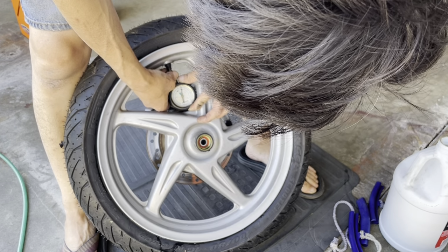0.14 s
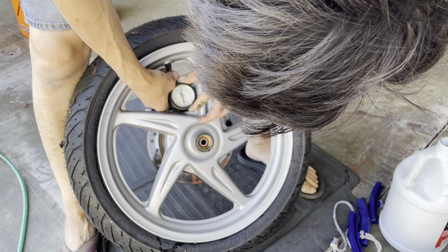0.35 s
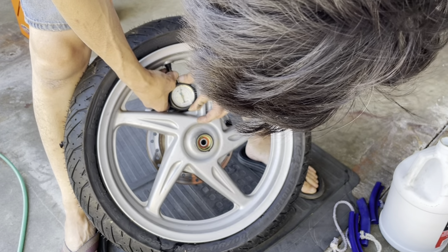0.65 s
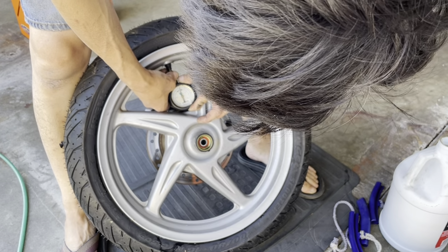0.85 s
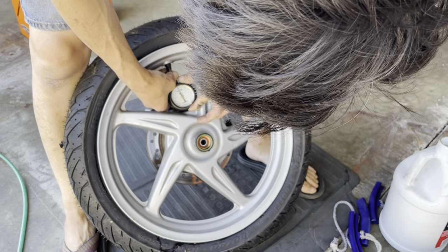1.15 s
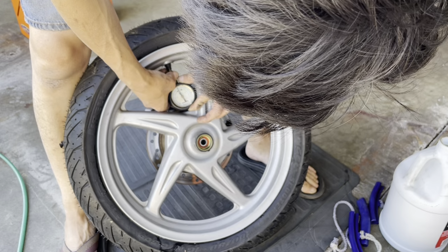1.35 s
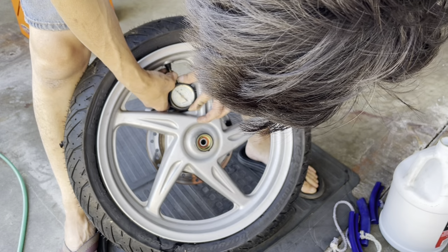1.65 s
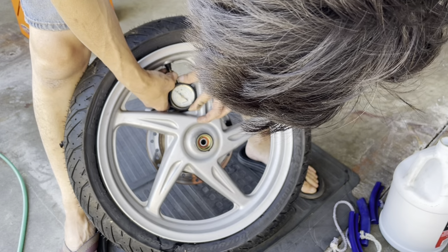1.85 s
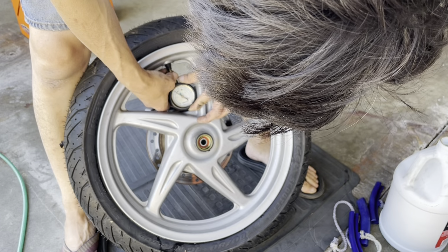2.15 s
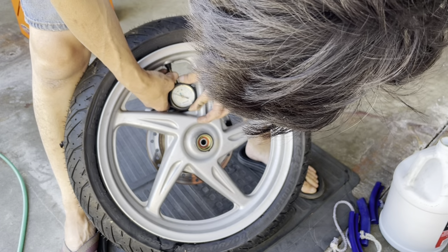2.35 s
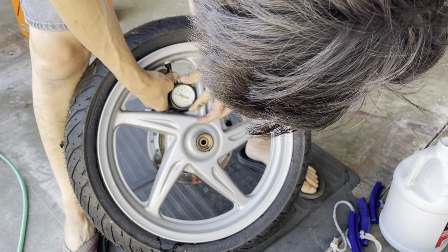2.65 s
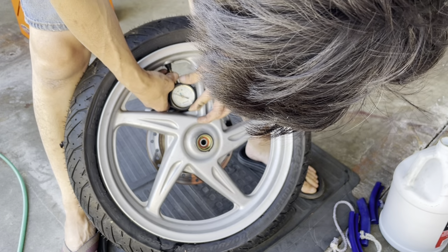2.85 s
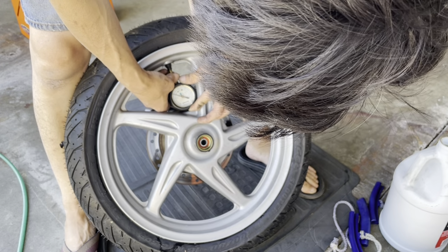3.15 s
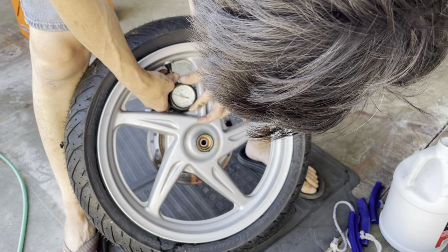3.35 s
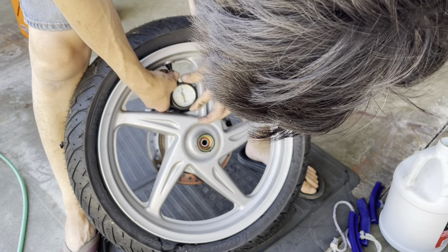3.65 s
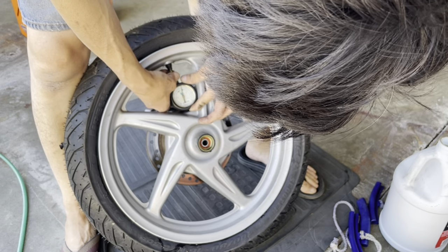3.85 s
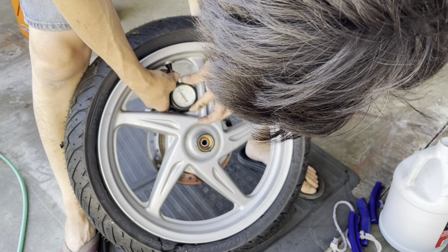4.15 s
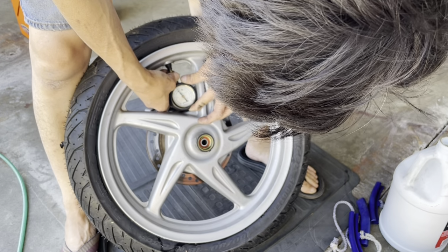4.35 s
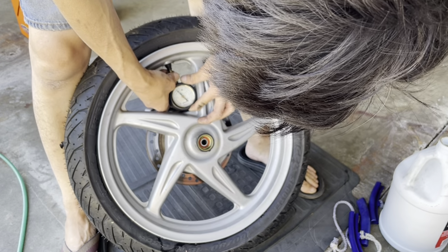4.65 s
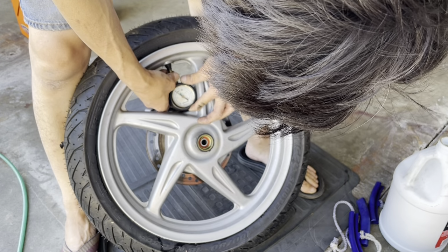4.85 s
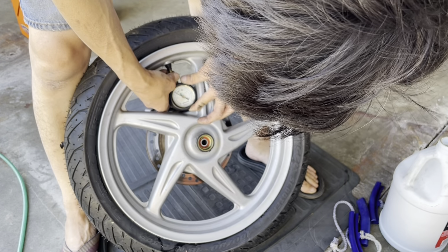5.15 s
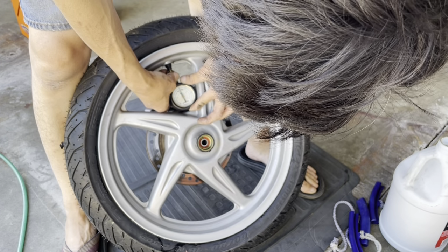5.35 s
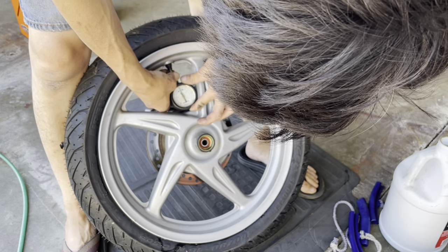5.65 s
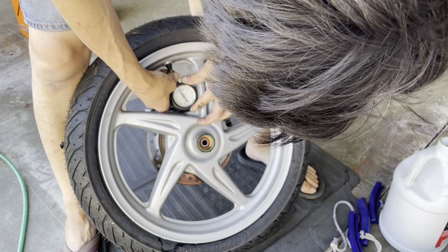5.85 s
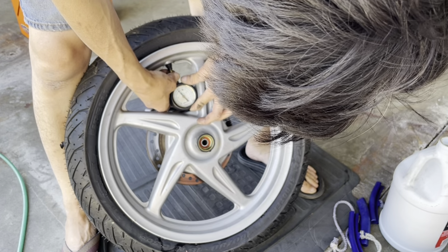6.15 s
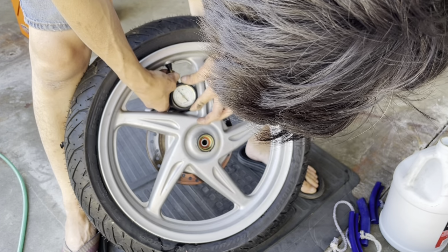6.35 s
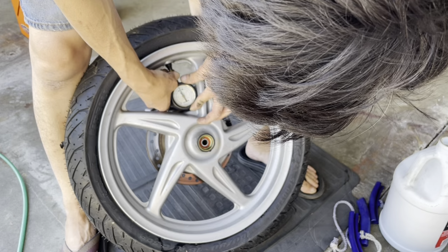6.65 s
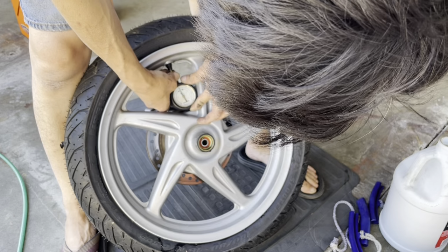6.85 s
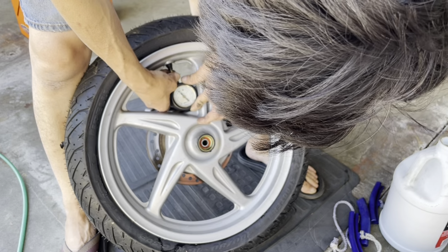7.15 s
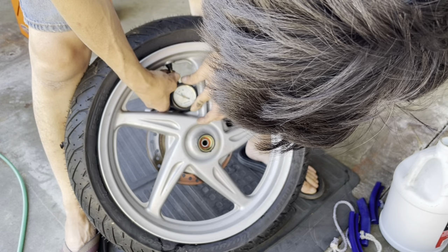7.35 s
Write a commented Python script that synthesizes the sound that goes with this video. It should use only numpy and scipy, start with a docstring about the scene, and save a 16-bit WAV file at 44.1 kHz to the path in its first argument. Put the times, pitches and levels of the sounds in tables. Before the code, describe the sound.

A strong, bright, gritty air jet from a scooter tyre runs about three and a half seconds, dips slightly midway, and stops abruptly. After a short gap with a light gauge tick, three weaker bursts follow, the middle one the softest and the last cut short by the ending. Close stereo microphone, left-leaning, short hard-walled reflections, low wavering motor hum and outdoor rumble underneath.

```python
"""In a small hard-walled yard air is let out of a scooter tyre: one long release, then three shorter ones.
A gauge pressed on the valve makes a jet of noise, coloured by the opening, the hand and the hollow of the wheel.
It leans left on a two-port microphone; blusters and shifts of the gauge recolour it, and broad bands come and go.
Each release has a short tail of decaying noise, and the gauge ticks twice, a noise snap with ringing sines.
Behind it are a far motor of wavering sines, a second faint hum and shaped outdoor noise."""
import sys
import numpy as np
from scipy import signal
from scipy.fft import rfft, irfft
from scipy.io import wavfile
from scipy.ndimage import uniform_filter1d

SR = 44100
rng = np.random.default_rng(int(sys.argv[2]) if len(sys.argv) > 2 else 0)


def master_out(mix):
    """Clip the mix to full scale and print it as 16-bit PCM to the path in sys.argv[1]."""
    frames = np.transpose(np.atleast_2d(mix))
    ceiling = np.clip(frames, -1, 1)
    pcm = np.round(ceiling * 32767).astype(np.int16)
    wavfile.write(sys.argv[1], SR, pcm)


N = 330309

# Presses of the gauge on the valve; the first is already open at the start.
# Each row: cracks open in seconds, seats on the pin in seconds, time to seat in seconds,
# let go in seconds, time to shut in seconds, first thin jet in relative dB, full flow in relative dB,
# opening in dB, low rush of air brushing the fingers in dB, top fizz in dB,
# edge resonance in Hz, its width in Hz, its boost in dB.
PRESSES = [(-0.3, -0.2, .03, 3.418, .075, -46, -28, -1, -3, -0.5, 11080, 1097, 2),
           (3.899, 3.971, .04, 5.302, 0.049, -43.5, -35, -1.7, -1, 0, 12970, 900, 3.5),
           (5.723, 5.743, 0.043, 6.47, 0.069, -40.5, -39, 4, 1.5, 1.5, 10280, 1400, 2),
           (6.878, 7.095, .012, 7.606, .07, -45, -31, 0, -0.7, -2.5, 2750, 1900, 3)]
SEEP_S = 0.15  # the next press takes over this long before it cracks open

TIME = np.arange(N) / SR
FRAME, HOP = 1024, 256  # short-time spectra, in samples
HZ = np.fft.rfftfreq(FRAME, 1 / SR)
FRAME_S = np.arange(N // HOP + 5) * HOP / SR


def amp(db):
    """Decibels to gain."""
    return 10 ** (np.asarray(db) / 20)


def unit(x):
    """Scales to an rms of 1."""
    return x / np.sqrt(np.mean(x ** 2) + 1e-20)


def over_hz(points, hz=HZ):
    """Reads a spectrum on a log-frequency axis."""
    f, value = np.transpose(points)
    return np.interp(np.log(hz + 1), np.log(f + 1), value)


def over_time(rows, t):
    """Reads every column of a curve at the times t."""
    s, *columns = np.transpose(rows)
    return [np.interp(t, s, column) for column in columns]


def ramp(t, start, length):
    """Rises from 0 to 1 and stays there."""
    return np.clip((t - start) / length, 0, 1)


def bump(centre_hz, width_hz):
    """A resonance curve of height 1, with its full width at half height."""
    return 1 / (1 + (2 * (HZ - centre_hz) / width_hz) ** 2)


def blend(first, other, likeness):
    """Mixes noise as strong as the first and alike to it by the given share."""
    likeness = np.clip(likeness, -1, 1)
    return likeness * first + np.sqrt(1 - likeness ** 2) * other


def noise_pair(likeness):
    """Random short-time spectra for two partly alike channels."""
    a, b, c, d = rng.standard_normal((4, len(FRAME_S), len(HZ)))
    left = a + 1j * b
    return np.array([left, blend(left, c + 1j * d, likeness)])


def to_sound(spectra):
    """Short-time spectra to samples."""
    return signal.istft(spectra.swapaxes(-1, -2), nperseg=FRAME, noverlap=FRAME - HOP)[1][..., :N]


def wander(rate_hz):
    """Slow random drift of rms 1, mostly below the given rate."""
    hz = np.fft.rfftfreq(N, 1 / SR)
    return unit(irfft(rfft(rng.standard_normal(N)) / (1 + (hz / rate_hz) ** 4), N))


def patches(size=14):
    """Random patches of rms 1 over time and frequency."""
    chance = rng.standard_normal((len(FRAME_S), len(HZ)))
    over_frames = uniform_filter1d(chance, size, axis=0)
    return unit(uniform_filter1d(over_frames, size // 2, axis=1))


def press_at(t):
    """Which press is under way at the times t."""
    return np.searchsorted([row[0] - SEEP_S for row in PRESSES[1:]], t)


def valve(t):
    """A pin valve seeps, cracks open, seats, shifts and shuts, which sets the flow and colour of its jet."""
    # The gauge shifts on the pin and stays so until the next press. Each row: start in seconds,
    # length in seconds, then the change in dB of flow, of opening, of brushing and of top fizz.
    shifts = [(0.013, .1, 1, 4.5, -0.5, 0.5), (0.41, 0.22, -2, -1, 0, 0.5), (1.25, 0.36, 1.7, -3.9, -.5, 1),
              (2.4, 0.014, -3, 1.6, 4, 1), (2.51, 0.037, 1.5, 0.36, 3, -1.5),
              (2.642, 0.13, -1.7, 0.86, 1, 0), (2.88, .08, -0.7, 0, 0, 3), (4.2, 0.087, 0.3, -0.5, -1, 1.5),
              (4.57, 0.22, 2.5, -.5, -2.5, 0.5), (5.2, .07, 0.7, -0.5, -.5, 0),
              (5.839, .03, 2.5, -1.36, 1, 1.5), (5.959, 0.027, 4, -1.2, -5, 0),
              (6.023, .07, -2.5, 0.65, 2, 1), (7.186, 0.09, 4.5, -0.6, -5, -0.5)]
    # The pin hangs on its seat and a weak leak lingers: start in seconds, end in seconds, flow in relative dB.
    leak_start, leak_end, leak_db = (6.5, 6.668, -66.5)
    seep_db, seep_rise_db_per_s = -75.5, 122  # a faint seep swells before the valve cracks
    crack_s, crack_opening_db = 0.014, -4.5  # the first thin jet
    creep_db_per_s = 34  # it grows as the pin is pushed in
    shut_db, shut_curve = 21, 1.3  # the flow falls this far in the time to shut, ever faster
    leak_stop_db_per_s = 700

    press = press_at(t)
    columns = np.array(PRESSES)[press].T
    crack, seat, seat_s, let_go, shut_s, crack_db, full_db, opening, brushing, fizz, *edge = columns
    for s, length, more_flow, more_opening, more_brushing, more_fizz in shifts:
        moved = ramp(t, s, length) * (press == press_at(s))
        full_db = full_db + moved * more_flow
        opening = opening + moved * more_opening
        brushing = brushing + moved * more_brushing
        fizz = fizz + moved * more_fizz

    cracked = 1 - np.exp(-np.maximum(t - crack, 0) / crack_s)
    seated = ramp(t, seat, seat_s)
    seeping_db = seep_db - seep_rise_db_per_s * np.maximum(crack - t, 0)
    creeping_db = crack_db + creep_db_per_s * (t - crack)
    thin_db = (1 - cracked) * seeping_db + cracked * creeping_db
    shutting_db = shut_db * (np.maximum(t - let_go, 0) / shut_s) ** shut_curve
    flow_db = (1 - seated) * thin_db + seated * full_db - shutting_db

    leaking_db = leak_db - leak_stop_db_per_s * np.maximum(t - leak_end, 0)
    flow_db = np.where(t > leak_start, np.maximum(flow_db, leaking_db), flow_db)
    opening = (1 - seated) * crack_opening_db + seated * opening
    return flow_db, opening, 1 - seated, brushing, fizz, edge


def passing_colour(fade_s=0.11):
    """Air blusters on a fingertip or the seal's lip; for a while a band of the hiss grows stronger or weaker."""
    # Brief blusters. Each row: peak in seconds, length in seconds, centre in Hz, width in Hz, boost in dB.
    puffs = [(2.398, .045, 1200, 900, 5), (2.583, .07, 800, 546, 5), (3.422, 0.033, 380, 499, 8),
             (3.462, .025, 483, 600, 9.5), (3.784, 0.12, 6600, 1300, 20), (5.802, .04, 552, 401, 4),
             (7.3, .14, 330, 200, 8)]
    # For a while a broad band of the hiss grows stronger or weaker.
    # Each row: start in seconds, end in seconds, centre in Hz, width in Hz, change in dB.
    passing_bands = [(1.45, 2.45, 4150, 450, 3), (2.4, 3.5, 1800, 600, -1.8), (2.6, 3.5, 1100, 220, 2),
                     (2.6, 3.5, 2950, 600, 1.7), (3.8, 4.9, 820, 347, -1.5), (4.65, 5.4, 5400, 900, 1.5),
                     (5.6, 6.6, 700, 600, 1.8), (6.8, 7.6, 750, 700, -2.5), (7.1, 7.6, 1900, 701, 2),
                     (7.1, 7.6, 5600, 1400, 2.5)]
    t = FRAME_S[:, None]
    colour_db = 0
    for s, length, hz, width, db in puffs:
        colour_db = colour_db + db * np.exp(-(2 * (t - s) / length) ** 2) * bump(hz, width)
    for start, end, hz, width, db in passing_bands:
        present = ramp(t, start, fade_s) - ramp(t, end, fade_s)
        colour_db = colour_db + db * present * bump(hz, width)
    return colour_db


def jet_colour(opening, thinness, brushing_db, fizz_db, edge):
    """Turbulence roars through a wide opening and sizzles through a narrow one; fingers add a low rush."""
    # The bare jet. Each row: frequency in Hz, relative dB per Hz.
    bare_jet = [(60, -24), (150, -16), (300, -11), (800, -6.4), (2000, -5.5), (3700, -8), (4700, -8.3),
                (6400, -4.8), (7200, -4.2), (8500, -2), (10400, -2.7), (12000, -5.3), (13900, -5),
                (15400, -1.8)]
    # What a wider opening does to the hiss. Each row: frequency in Hz, dB per dB of opening.
    widening = [(200, 0.35), (350, 0.2), (700, 0.37), (1100, 0.9), (1330, 1.36), (1620, 1.53), (2000, 1.03),
                (2500, 1.1), (3300, 0.76), (4300, .5), (6000, 0.53), (9000, 0), (11000, 0), (14500, -0.07)]
    # Colour of the first thin jet against the full one. Each row: frequency in Hz, change in dB.
    thin_colour = [(400, -0.5), (1100, 0), (1600, 1.5), (2600, -2), (3300, 0), (3750, -3.5), (4200, -0.5),
                   (4800, -3), (5600, 2), (7000, -0.5), (9000, 0.5)]
    fizz_hz, fizz_width_hz = 14800, 3900  # the finest eddies, at the lip of the seal
    brush_hz, brush_width_hz = 330, 480
    patchy_db = 0.69  # rms
    edge_hz, edge_width_hz, edge_db = edge

    colour_db = over_hz(bare_jet) + opening[:, None] * over_hz(widening)
    colour_db += thinness[:, None] * over_hz(thin_colour)
    colour_db += fizz_db[:, None] * bump(fizz_hz, fizz_width_hz)
    colour_db += brushing_db[:, None] * bump(brush_hz, brush_width_hz)
    colour_db += edge_db[:, None] * bump(edge_hz[:, None], edge_width_hz[:, None])
    return colour_db + passing_colour() + patchy_db * patches()


def hollows_colour(opening, brushing_db):
    """The cupped hand, wheel and gauge head resonate, drifting as the hand is never still."""
    # Resonances of hand and wheel at each port.
    # Each row: frequency in Hz, width in Hz, left boost in dB, right boost in dB.
    hollows = [(336, 98, 3.5, 4), (535, 87, 3, 3.5), (941, 250, 0.7, 0.5), (1113, 200, 2.6, 3),
               (1567, 270, 5, 2), (1870, 235, .5, 2.5), (2194, 104, 2.5, -1), (2747, 287, 4.5, 4),
               (3276, 307, 3.5, 4.8), (4110, 220, 3.5, 0.3), (5380, 420, 4.5, 2), (9370, 690, 2, 1.5),
               (11040, 380, 4, 4), (13400, 810, 1.5, 1.5)]
    # Reflections off the rim and spokes, mostly cancelling narrow bands.
    # Each row: frequency in Hz, width in Hz, left change in dB, right change in dB.
    dips = [(620, 50, -2, -.5), (1300, 55, -6, .5), (1320, 50, 0.9, -5), (2080, 79, -4.5, 0),
            (2440, 100, -3.5, 0), (3000, 80, 1, -0.5), (3850, 90, -2.5, -1.1), (4400, 55, -2, 0.5),
            (4850, 300, -0.9, 0.5), (6030, 131, -1, 0), (10600, 104, -1.5, -1), (13637, 280, -5.5, -5.1)]
    drift_share, drift_hz = 0.0046, 1.2  # rms share by which the hollows drift, and how fast
    head_hz, head_width_hz, head_base_db = 5880, 320, 4.5
    damping, drive = 0.32, 0.22  # fingers damp the head (dB per dB), a wide opening drives it (dB per dB)

    drift = 1 + drift_share * np.interp(FRAME_S, TIME, wander(drift_hz))[:, None]
    colour_db = 0
    for hz, width, left_db, right_db in [*hollows, *dips]:
        colour_db = colour_db + np.multiply.outer([left_db, right_db], bump(hz * drift, width))
    head_db = head_base_db - damping * brushing_db[:, None] + drive * opening[:, None]
    return colour_db + head_db * bump(head_hz * drift, head_width_hz)


def jet(level_db=5.5, flutter_db=0.48, flutter_hz=30):
    """Turbulent air hisses at the valve and reaches the two ports by paths of different length."""
    # Each row: frequency in Hz, radians by which left leads.
    port_phase = [(100, .1), (330, .2), (520, .65), (1200, .8), (1500, 1.1), (1800, 0), (2130, .9),
                  (2420, .1), (2800, 1.1), (3550, 1.6), (3880, .7), (4080, -2.2), (4300, -.3), (5200, -.2),
                  (6900, -3.1), (7700, -3.3), (9000, -4.7), (11000, -6.28), (13000, -7.9), (14000, -9.25),
                  (15000, -9.6), (15800, -10.2)]
    # Each row: frequency in Hz, likeness of the ports from 0 to 1.
    port_likeness = [(200, .95), (900, .84), (1150, .9), (1520, .5), (1800, .97), (2100, .7), (2420, .95),
                     (2950, .78), (3300, .84), (3700, .4), (4100, .28), (4350, .6), (4800, .75),
                     (6400, .65), (6900, .99), (7700, .99), (8300, .88), (11000, .94), (13000, .82),
                     (14200, .98), (15700, .86)]
    # Lean to the left, besides the hollows. Each row: frequency in Hz, left minus right in dB.
    port_balance = [(100, .5), (450, 2), (740, 3.5), (1220, 5.5), (2010, 2), (3330, 3), (4700, 2.5),
                    (5600, 6), (6400, 3), (6900, 0), (15000, 0)]

    flow_db, opening, thinness, brushing_db, fizz_db, edge = valve(FRAME_S)
    colour_db = jet_colour(opening, thinness, brushing_db, fizz_db, edge)
    air = noise_pair(over_hz(port_likeness)) * amp(colour_db + hollows_colour(opening, brushing_db))
    lean = amp(over_hz(port_balance) / 2)
    ports = np.array([lean, np.exp(-1j * over_hz(port_phase)) / lean])
    hiss = unit(to_sound(air * ports[:, None]))
    flow_now_db = np.interp(TIME, FRAME_S, flow_db)
    return hiss * amp(level_db + flow_now_db + flutter_db * wander(flutter_hz))


def yard(x, first_s=0.009, likeness=0.8):
    """Floor and walls return dense reflections, partly alike at both ports, whose decay varies with pitch."""
    # Each row: frequency in Hz, time to fall by 60 dB in seconds.
    decay = [(250, 0.5), (1000, 0.23), (3500, 0.46), (8000, 0.44), (14000, 0.25)]
    # Each row: frequency in Hz, level of the tail in dB against the direct sound.
    tail_db = [(250, -19), (1500, -11), (4000, -12.5), (5800, -15), (7300, -32), (9000, -19),
               (15000, -19.5)]
    a, b = rng.standard_normal((2, SR)) * (np.arange(SR) > first_s * SR)
    taps = np.array([a, blend(a, b, likeness)])
    hz, t, z = signal.stft(taps, SR, nperseg=256)
    t60 = over_hz(decay, hz)[:, None]
    even = np.sqrt(2 * np.log(1000) / (t60 * SR))  # about the same energy whatever the decay
    fading = amp(over_hz(tail_db, hz)[:, None] - 60 * t / t60)
    tail = signal.istft(z * even * fading, SR, nperseg=256)[1]
    return signal.fftconvolve(x, tail, axes=1)[:, :N]


def motor(waver_db=1.9, drift_hz=0.12, lead=1.0):
    """A far motor hums in orders of its running speed; standing waves put the ports out of step (radians)."""
    # The main hum, at twice the running speed. Each row: time in seconds, frequency in Hz, level in dB.
    main_hum = [(0.1, 122.3, -49), (1.56, 121, -47.5), (2.48, 121.5, -59), (3, 121.3, -67),
                (3.67, 121.1, -68), (4.45, 122, -53), (5.45, 122, -57.5), (5.51, 121.6, -66),
                (7.24, 121.6, -55.5), (7.3, 121, -55.5)]
    # Other orders swell and fade. Each row: time in seconds, then levels of the 3rd, 4th and 6th in dB.
    other_orders = [(0, -55.5, -55.5, -73), (0.6, -58.5, -60.5, -75), (1.3, -65, -63, -77),
                    (2.05, -74, -66, -73), (2.45, -69.5, -62, -75), (3.6, -67, -68, -69),
                    (3.9, -63, -62, -79), (4.35, -66, -58, -80), (4.9, -72, -69, -80),
                    (5.55, -84, -77, -83), (6.15, -77, -62, -80), (6.65, -70, -62.5, -81),
                    (6.95, -66.5, -66.5, -81), (7.49, -73, -59, -74)]
    shaft_db = -68  # the running speed itself, wavering around one level
    main_hz, main_db = over_time(main_hum, TIME)
    turn = 2 * np.pi * np.cumsum(main_hz / 2 + drift_hz * wander(3.3)) / SR
    lines = [(2 * turn, main_db)]
    for order, db in zip((1, 3, 4, 6), [shaft_db, *over_time(other_orders, TIME)]):
        lines.append((order * turn, db + waver_db * wander(0.52)))
    ports = lead * np.array([[0.5], [-0.5]])
    tones = sum(amp(db) * np.sin(phase + ports + 2 * np.pi * rng.random()) for phase, db in lines)
    return np.sqrt(2) * tones  # levels are rms


def second_hum(waver_db=1.9):
    """A fainter distant hum is one sine, wavering in level and phase."""
    # Frequency in Hz, level in dB.
    hz, db = (103, -66)
    level = amp(db + waver_db * wander(1.5))
    return np.sqrt(2) * level * np.sin(2 * np.pi * hz * TIME + wander(2.2))


def ambient(level_db=-61, rumble_hz=110):
    """Outdoor noise is alike at both ports in the bass and diffuse above; only its rumble swells."""
    # Each row: frequency in Hz, relative dB per Hz.
    spectrum = [(15, -41), (28, -11), (42, -10.5), (58, 0.5), (78, -1.5), (104, -3), (150, -8.5),
                (240, -10), (330, -17.5), (520, -18), (750, -19.5), (1400, -31.5), (3000, -41), (8000, -57),
                (15000, -59)]
    # Each row: frequency in Hz, left-right likeness from 0 to 1.
    port_alike = [(60, 0.95), (200, 0.88), (400, 0.65), (700, .1), (4000, 0.16)]
    # Each row: time in seconds, gain of the low rumble in dB.
    rumble_swell = [(0, 9), (2.1, 0), (2.7, -11), (3.7, -8.5), (4.2, 3.5), (7.49, 5.5)]
    hz = np.fft.rfftfreq(N, 1 / SR)
    left, other = rfft(rng.standard_normal((2, N)))
    pair = np.array([left, blend(left, other, over_hz(port_alike, hz))])
    air = unit(irfft(pair * amp(over_hz(spectrum, hz)), N))
    rumble = irfft(rfft(air) / (1 + (hz / rumble_hz) ** 4), N)
    swell_db, = over_time(rumble_swell, TIME)
    return amp(level_db) * (air - rumble + amp(swell_db) * rumble)


def tick(bright_hz, ring_db=-11, snap_t60=0.04, rise_s=0.0022):
    """One small contact makes a soft snap of noise and a short ring of the gauge."""
    # What the gauge rings with. Each row: frequency in Hz, relative level in dB, fall by 60 dB in seconds.
    gauge_modes = [(1050, 6, 0.066), (1640, -3, .04), (2407, -8, .03), (3450, -10, .02)]
    t = np.arange(SR // 5) / SR
    ring = 0
    for hz, db, t60 in gauge_modes:
        ring = ring + amp(db - 60 * t / t60) * np.sin(2 * np.pi * (hz * t + rng.random()))
    b, a = signal.butter(3, min(bright_hz, SR / 3), fs=SR)
    grit = unit(signal.lfilter(b, a, rng.standard_normal(len(t))))
    return ramp(t, 0, rise_s) * (amp(ring_db) * ring + amp(-60 * t / snap_t60) * grit)


def handling():
    """The gauge knocks lightly on the valve stem."""
    # Each row: start in seconds, level in dB, brightness in Hz.
    knocks = [(3.8, -61.5, 3200), (6.668, -64, 3600)]
    out = np.zeros(N)
    for s, db, bright_hz in knocks:
        sound = amp(db) * tick(bright_hz)
        part = out[round(s * SR):][:len(sound)]
        part += sound[:len(part)]
    return out


def scene():
    """The valve close by, its echo, and the background."""
    near = jet() + handling()
    return near + yard(near) + motor() + second_hum() + ambient()


def record(dry, low_cut_hz=38, cutoff_hz=15780):
    """The microphone sheds the lowest bass; then the recorder limits the treble."""
    low_cut = signal.butter(2, low_cut_hz, "highpass", fs=SR, output="sos")
    thin = signal.sosfilt(low_cut, dry)
    band_limit = signal.firwin(1023, cutoff_hz, window=("kaiser", 9), fs=SR)
    return signal.oaconvolve(thin, band_limit[None], "same", axes=1)


dry = scene()
out = record(dry)
master_out(out)
```